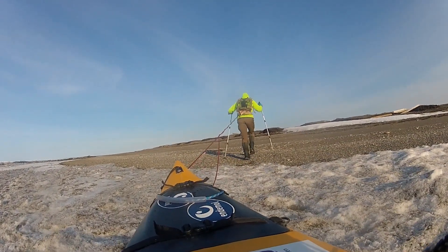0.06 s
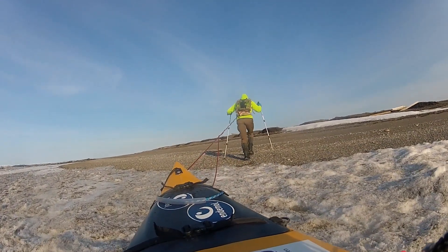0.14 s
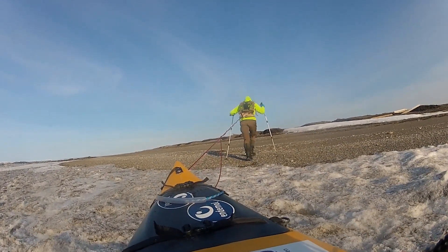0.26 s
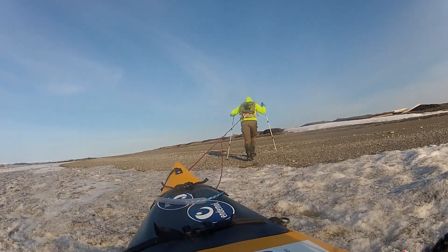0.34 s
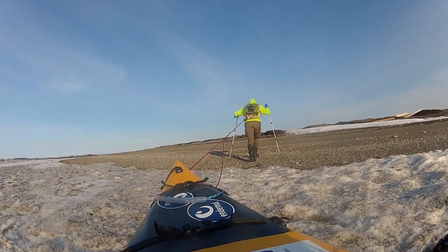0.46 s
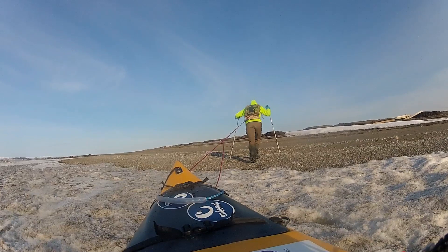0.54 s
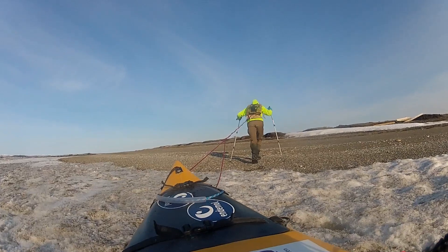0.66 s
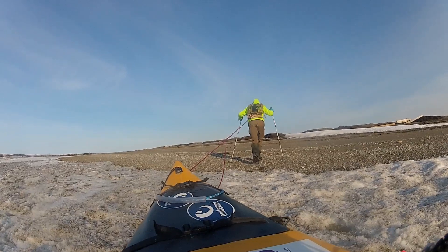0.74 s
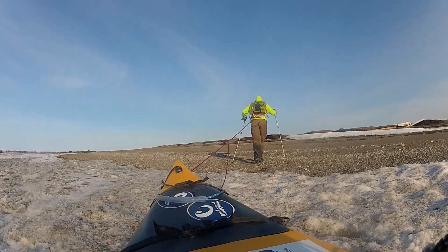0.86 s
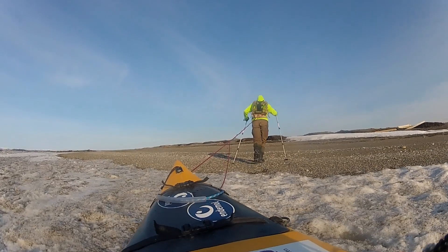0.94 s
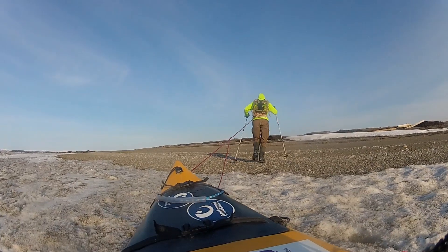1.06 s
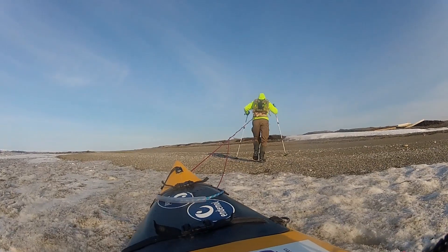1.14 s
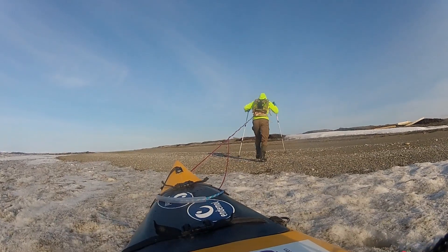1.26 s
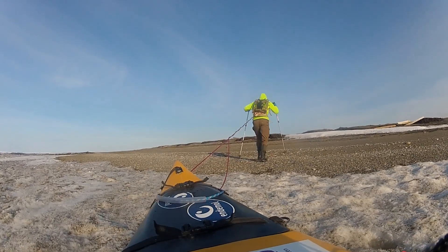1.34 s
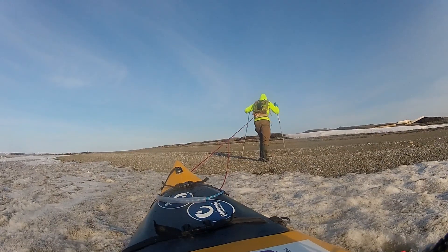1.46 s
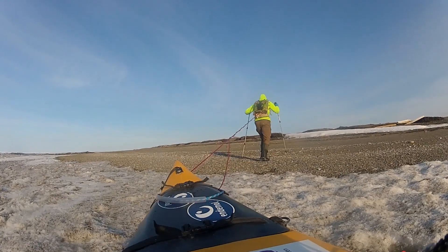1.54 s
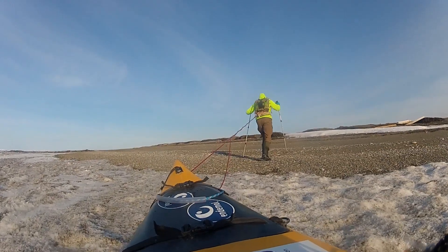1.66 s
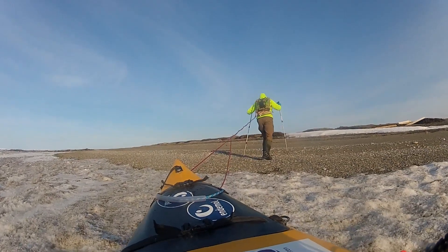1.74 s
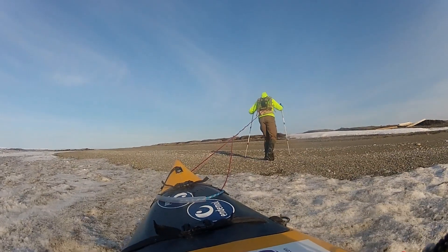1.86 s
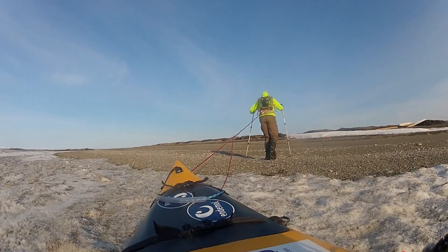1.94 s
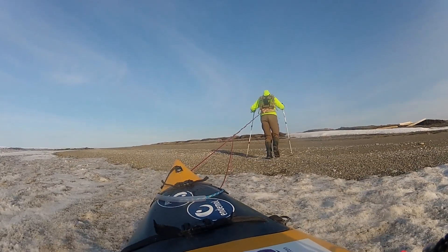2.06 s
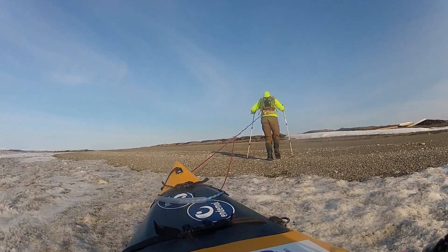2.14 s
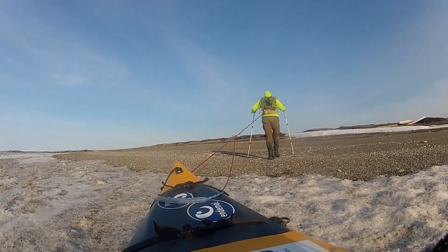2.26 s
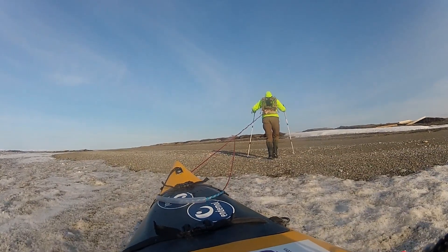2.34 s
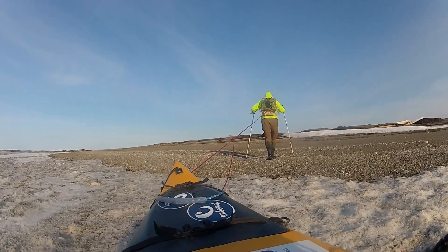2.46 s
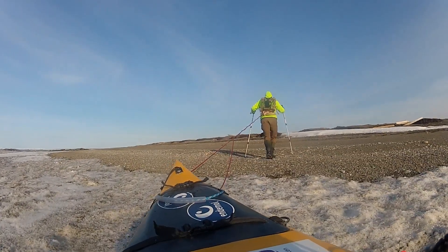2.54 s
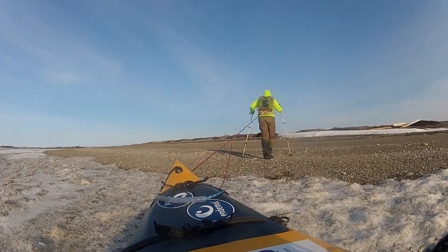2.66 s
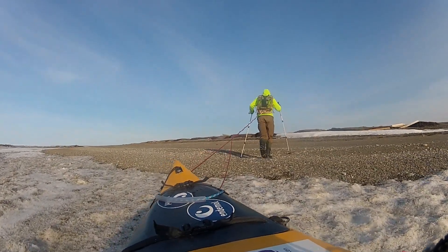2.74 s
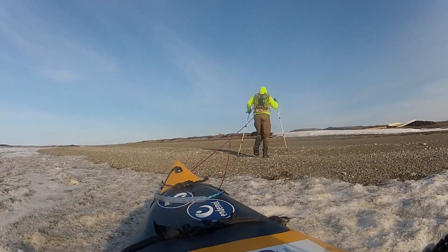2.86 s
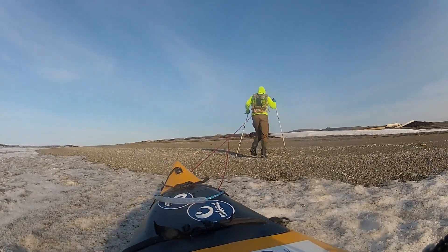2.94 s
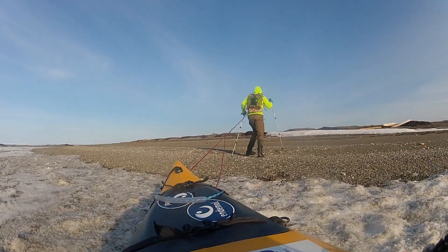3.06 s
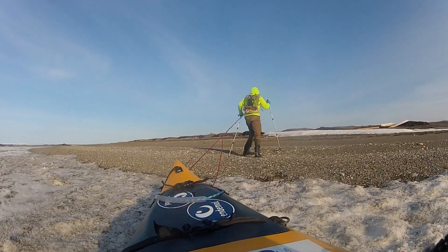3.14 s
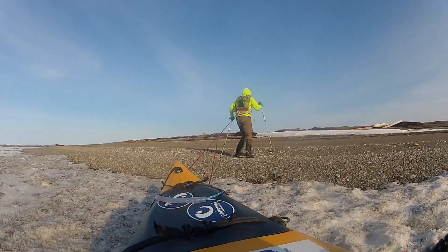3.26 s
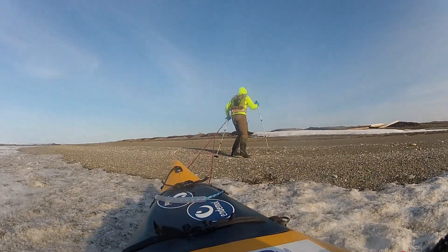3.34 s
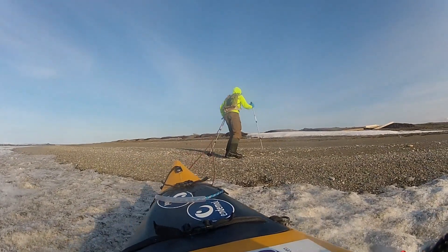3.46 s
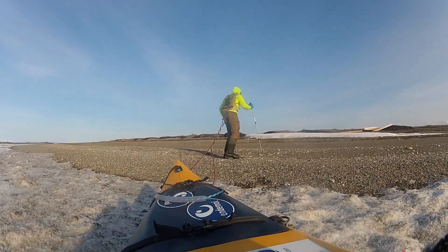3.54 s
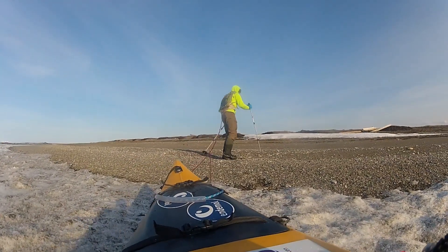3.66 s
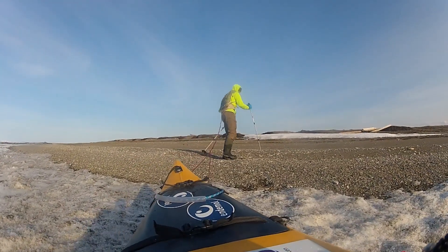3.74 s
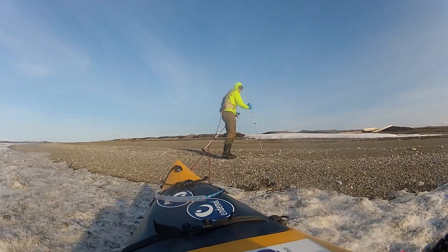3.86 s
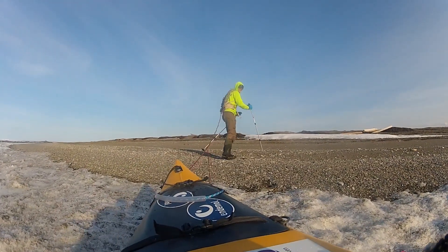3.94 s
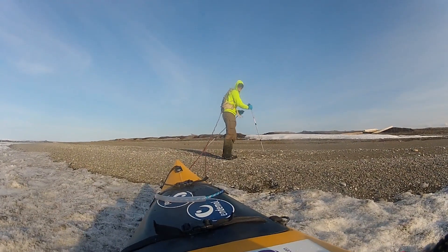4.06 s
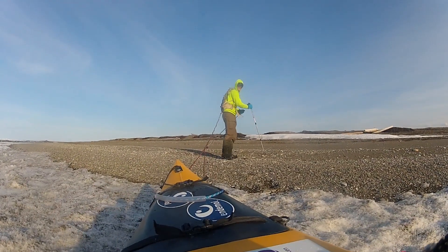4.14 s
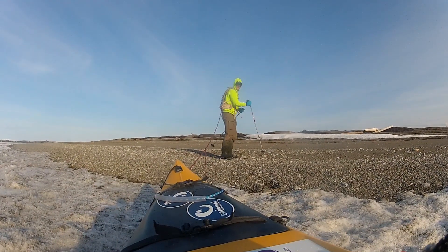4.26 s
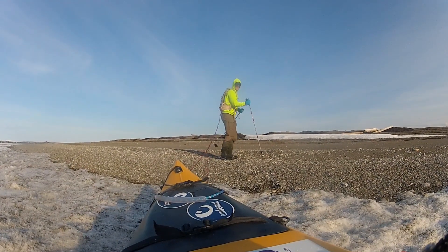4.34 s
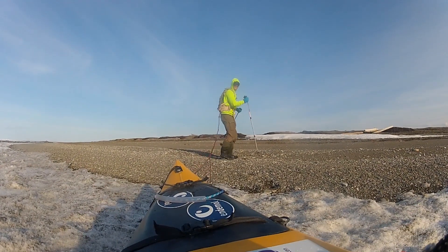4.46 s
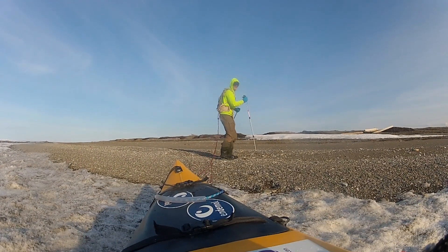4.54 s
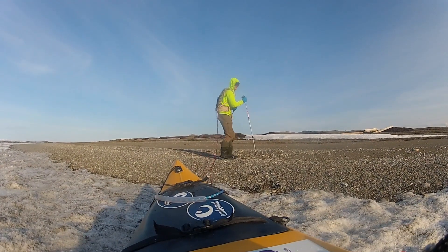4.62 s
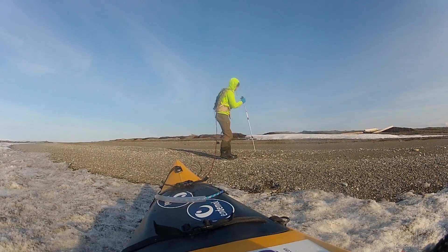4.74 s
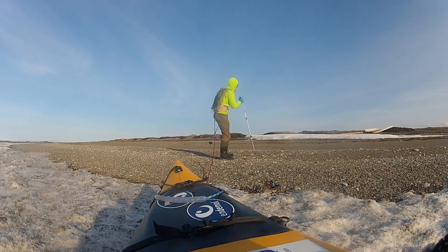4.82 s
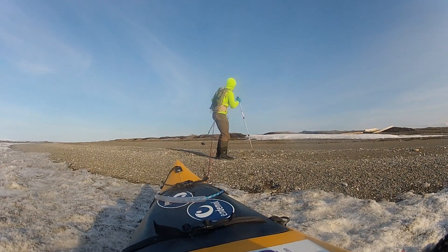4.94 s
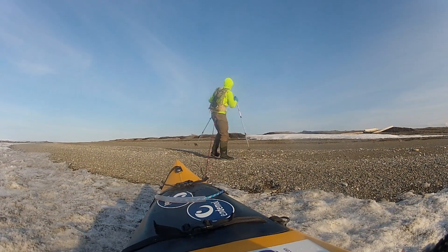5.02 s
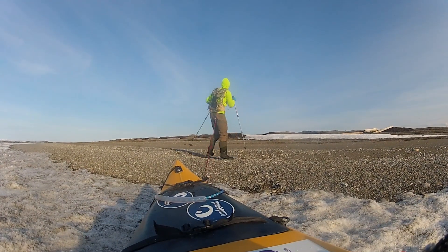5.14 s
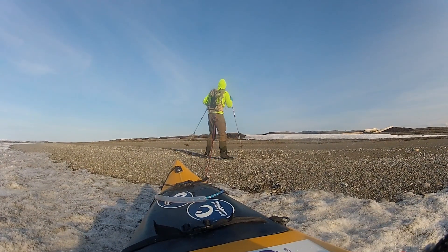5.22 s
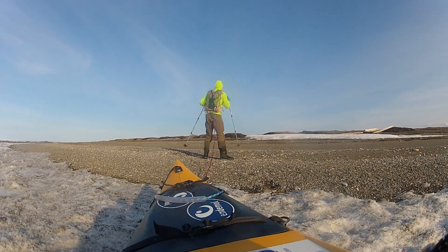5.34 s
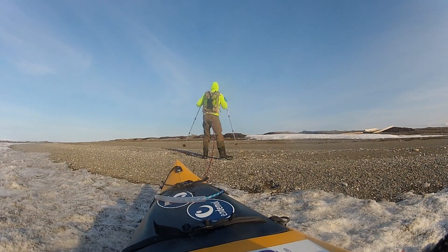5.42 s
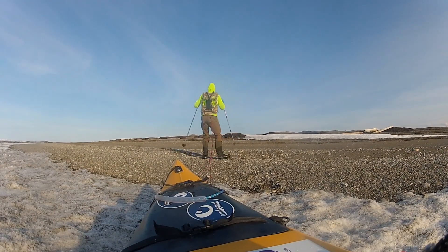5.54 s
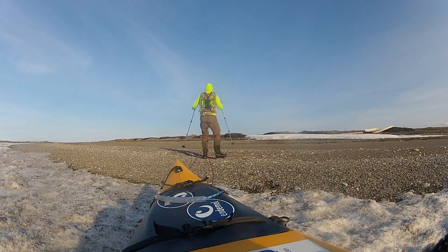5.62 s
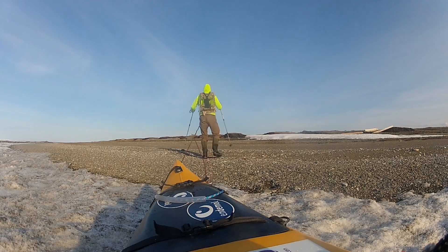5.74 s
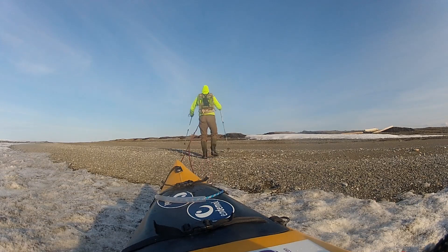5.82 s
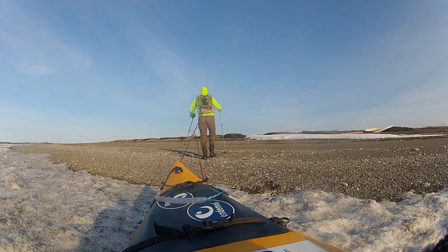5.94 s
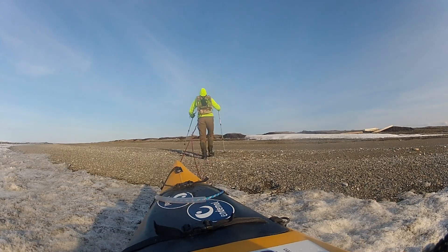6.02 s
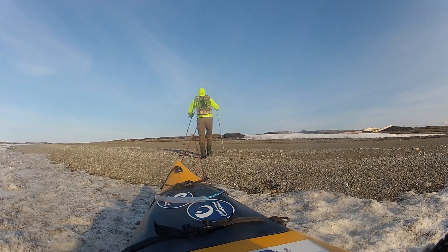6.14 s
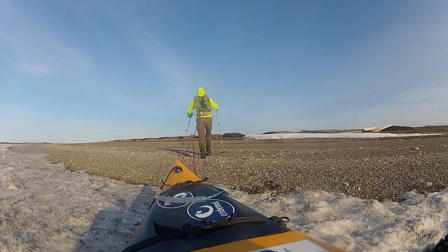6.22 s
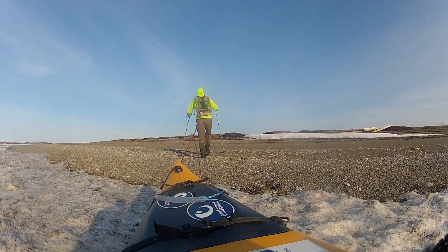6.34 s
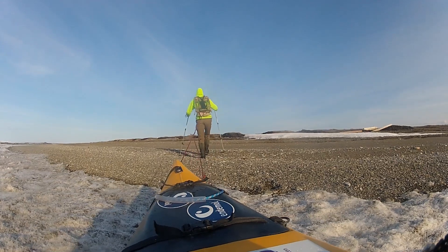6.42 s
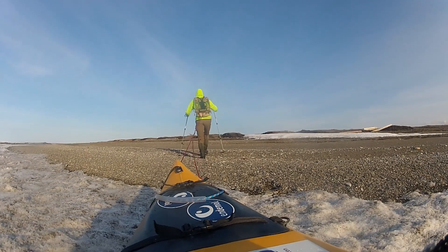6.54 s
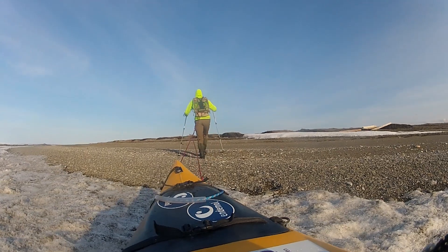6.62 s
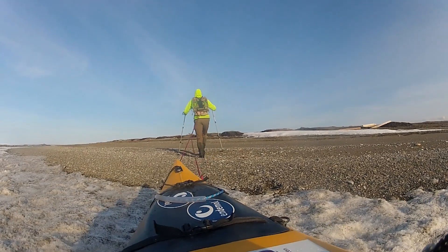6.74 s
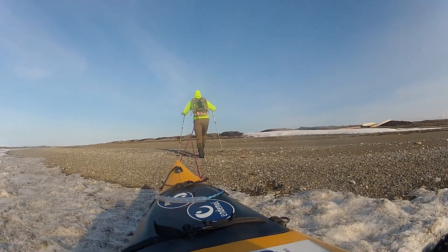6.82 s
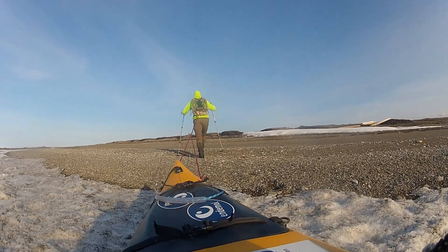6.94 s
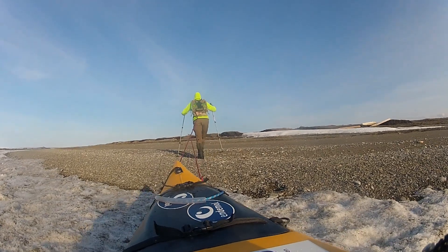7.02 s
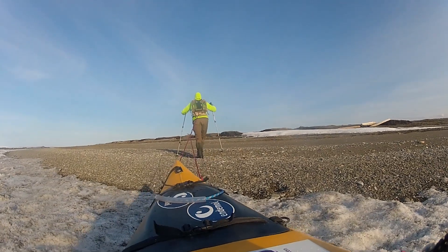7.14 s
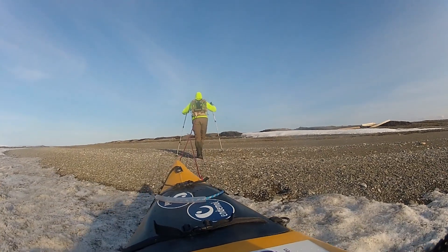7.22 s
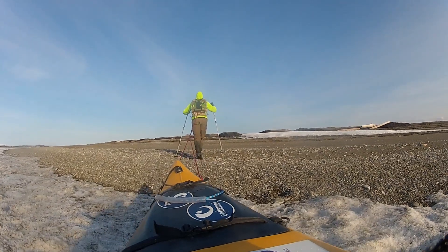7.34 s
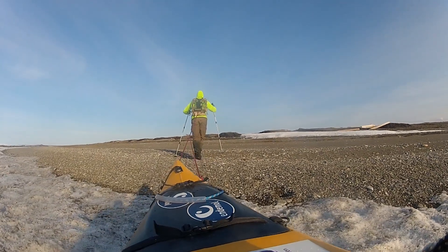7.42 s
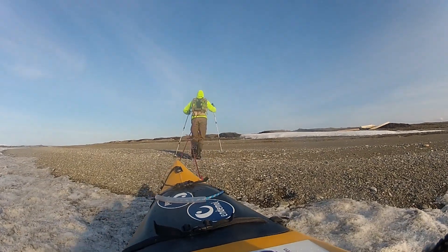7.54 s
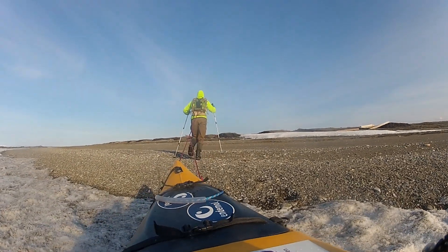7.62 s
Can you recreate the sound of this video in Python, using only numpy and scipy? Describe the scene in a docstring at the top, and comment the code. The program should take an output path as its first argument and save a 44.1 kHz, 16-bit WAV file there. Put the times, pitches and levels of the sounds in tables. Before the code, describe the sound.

A hollow plastic hull is dragged over crusty snow and stones, grinding, drumming and cracking, stops for a second, then scrapes onward in light wind.

```python
"""A plastic hull with a camera strapped on deck is towed over crusty snow and stones, stops, and is towed on.
From the start, streams of clicks ring the shell as drumming and the mount as grind, under thumps, cracks and knocks.
A smooth hiss of fine grains joins after 1.5 s and fades by 4 s; near 4.4 s the scrape sinks, and the hull rests.
From about 5.5 s bumps return, then the drumming and scrape swell again; light wind, a shaped noise, runs throughout.
The camera samples slowly and holds each value, so a mirror of the sound lies around the sampling rate."""
import sys
import numpy as np
from scipy import signal
from scipy.fft import rfft, irfft
from scipy.io import wavfile

SR = 44100
rng = np.random.default_rng(int(sys.argv[2]) if len(sys.argv) > 2 else 0)


def inscribe(sig):
    """Save sig as 16-bit PCM at rate SR to the path in sys.argv[1].

    A 1-D sig is mono; a 2-D sig holds one channel per row.
    Samples are clipped to [-1, 1] before scaling.
    """
    pcm = np.round(np.clip(np.atleast_2d(sig).T, -1, 1) * 32767)
    wavfile.write(sys.argv[1], SR, pcm.astype(np.int16))


N = 338688

# Source levels in these tables are settings ahead of each layer's fixed trim.
# How hard the ground drums the shell. Each row: time in seconds, level in dB.
HAUL = [(0, -43), (.3, -44.5), (.6, -46.5), (.92, -43.5), (1.3, -48), (1.7, -45.5), (1.95, -46.5),
        (2.08, -50), (2.6, -46), (2.9, -51), (3.25, -47), (3.44, -40.5), (3.74, -48.5), (3.9, -43.5),
        (4.02, -45), (4.08, -49), (4.22, -51.5), (4.3, -59), (5.4, -61.5), (5.75, -55.5), (5.97, -56),
        (6.3, -52), (6.46, -55), (6.72, -45.5), (7.12, -48), (7.3, -47.5), (7.5, -46), (7.68, -47.5)]
# Drumming resonances of the shell. Each row: centre in Hz, width in Hz, relative level in dB.
SHELL_MODES = [(133.5, 38.2, 5), (256.3, 89.6, -8)]
# Rattle resonances in the hollow of the hull. Each row: centre in Hz, width in Hz, relative level in dB.
HOLLOW_MODES = [(342, 62, -2.5), (595, 217, -4.5), (651, 170, -3.5)]
# Slow mode of the whole boat. Its row: centre in Hz, width per pass in Hz, relative level in dB.
PITCHING_MODE = [(26.9, 19.7, 0)]
# The camera shaking on its arm. Its row: centre in Hz, width per pass in Hz, relative level in dB.
SHUDDER_MODE = [(63.5, 30.5, 0)]
# The bow lurches over a ridge. Each row: peak in seconds, pitching in dB, length in seconds, shudder in dB.
LURCHES = [(.07, -50, .04, -56), (0.413, -51, 0.12, -64), (0.647, -47, .04, -49), (.79, -47, 0.071, -46),
           (0.935, -36.5, 0.056, -51.5), (1.313, -44.5, 0.24, -58), (1.663, -35, 0.062, -53),
           (1.936, -45, 0.046, -53), (2.144, -40, 0.076, -50), (2.505, -45.5, 0.13, -53),
           (2.725, -42, 0.086, -60), (3.004, -40.5, 0.064, -58), (3.11, -46, 0.056, -48.5),
           (3.297, -40.5, 0.039, -66), (3.433, -43, 0.042, -46), (3.88, -38, 0.048, -57),
           (4.004, -41, .04, -58), (4.224, -51, 0.037, -72), (4.385, -50.5, 0.049, -68),
           (6.165, -44, 0.078, -58), (6.307, -49, 0.044, -72), (6.547, -51, 0.066, -51),
           (6.968, -44, 0.14, -55), (7.115, -52, .04, -51.5), (7.3, -44.5, 0.12, -57.5),
           (7.62, -54, 0.033, -50.5)]
# Lumps under the keel. Each row: start in seconds, level in dB, pitch in Hz, time to fall 60 dB in seconds.
THUMPS = [(.077, -21.5, 133, 0.089), (0.101, -21.5, 102, 0.05), (.127, -30, 117, 0.067),
          (.159, -30.5, 134, 0.14), (.525, -35, 135, 0.14), (.574, -32, 139, 0.1), (.698, -30.5, 145, 0.16),
          (.768, -33, 138, .12), (.931, -36, 150, 0.24), (1.299, -28, 136, 0.084),
          (1.644, -15.5, 124, 0.06), (1.784, -35, 139.6, 0.16), (1.961, -29, 125, 0.098),
          (2.103, -31, 101, 0.14), (2.149, -25.5, 120, 0.062), (2.648, -35, 138, 0.073),
          (2.732, -38, 123, 0.065), (2.964, -28.5, 125, 0.071), (3.457, -16, 172, 0.031),
          (3.818, -24, 151, 0.064), (3.885, -39, 164, .11), (4.024, -29, 100, .063),
          (4.132, -39, 157, 0.22), (5.573, -41, 149, 0.086), (5.835, -39, 135, .14),
          (5.91, -37.5, 142, 0.12), (6.017, -29, 149, 0.055), (6.174, -37, 149, 0.094),
          (6.472, -34.5, 147, 0.096), (6.518, -31.5, 152, 0.092), (6.545, -33.5, 137, .1),
          (6.59, -31.5, 159, 0.081), (6.947, -32, 153, 0.12), (7.228, -39, 101, .093)]
# The steady scrape. Each row: time in seconds, grind in dB, crunch in dB.
SCRAPE = [(0, -52.5, -58), (.23, -56.5, -61.5), (.36, -53.5, -58.5), (.75, -52.5, -61), (.95, -50, -55.5),
          (1.25, -52, -61), (1.8, -52, -56), (2.15, -54.5, -69), (2.4, -58, -68), (2.7, -54.5, -62),
          (2.87, -59, -69), (3.12, -54.5, -60), (3.36, -49.5, -54), (3.62, -55, -59.5),
          (3.77, -64.5, -69.5), (3.85, -56, -64), (4.15, -63.5, -68), (4.4, -81, -81.5),
          (5.6, -80.5, -77.5), (6.0, -75, -74), (6.12, -65, -72), (6.5, -68.5, -73.5), (6.67, -59, -67),
          (7.0, -58, -63.5), (7.25, -57.5, -62), (7.68, -55.5, -63.5)]
# A harder patch rasps along the hull. Each row: peak in seconds, grind in dB, length in seconds,
# crunch in dB over the grind, rattle in dB over the grind.
RASPS = [(0.095, -51, 0.038, -7, -1), (0.164, -49, 0.025, -5.5, -13), (.32, -52, 0.052, -11, -14),
         (.82, -54.5, 0.049, -1.5, -4), (.9, -47, .03, -10, -16), (1.21, -50, .02, -14, -19),
         (1.506, -62, .04, 4, -14), (1.678, -45, 0.047, -11, -7), (1.74, -50, .03, -15, -1),
         (2.1, -53, .02, -14, 1.5), (2.27, -58.5, 0.048, -3, -4), (2.458, -57.5, .05, 0, -8),
         (2.655, -50, .012, -11, -9), (2.742, -56.5, 0.051, -4, -1), (2.98, -57.5, 0.038, -8, 3),
         (3.1, -59, 0.059, -9, 6), (3.24, -59.5, 0.046, -8, 7), (3.428, -40.5, 0.059, -5, -6),
         (3.508, -45, 0.072, -10, -4), (3.695, -57.5, 0.035, -5, -6), (3.84, -56.5, 0.025, -9, 1.5),
         (3.91, -62, .03, -10, 5), (4.01, -61, 0.039, -5, 3), (5.582, -61, .01, -14, -8),
         (5.839, -60, 0.0074, -11, -8), (5.903, -77.5, 0.028, 15, 1.5), (6.008, -59, 0.013, -16, 1),
         (6.078, -59, .012, -14, -9), (6.158, -60, 0.037, -11, 1), (6.605, -52.5, 0.021, -10, -19),
         (6.635, -62, .015, 0, -12), (6.91, -52, .025, -6, -17), (7.323, -55, 0.042, -20, -13),
         (7.55, -62.5, 0.077, -2, 5.5)]
# Grind resonances of the camera mount. Each row: centre in Hz, width in Hz, relative level in dB.
MOUNT_MODES = [(1159, 126, 3.5), (1510, 280, -4), (1967, 362, 3.5), (2328, 308, 3), (2920, 330, -10),
               (3445, 310, -5.5)]
# Bright crunch resonances. Each row: centre in Hz, width in Hz, relative level in dB.
CRUNCH_MODES = [(3645, 470, -4), (4190, 900, -1), (4820, 580, -1.5), (5660, 310, -10.5), (3396, 1050, -4.5)]
# A stretch of smooth packed snow, hissing. Each row: time in seconds, level in dB.
GLIDE = [(0, -69), (.8, -70), (1.2, -64), (1.5, -54), (1.65, -49.5), (1.9, -49), (2.15, -50.5), (2.25, -57),
         (2.6, -53), (2.8, -53.5), (3.0, -56.5), (3.3, -58), (3.45, -58), (3.7, -69), (4.1, -100),
         (7.68, -91)]
# Hiss resonances of packed snow. Each row: centre in Hz, width in Hz, relative level in dB.
PACKED_MODES = [(2314, 166, 2), (2800, 310, -18), (3257, 127, 0), (3670, 1350, -8.5), (4900, 450, -11)]
# Crust cracking. Each row: start in seconds, level in dB, brightness in dB.
CRACKS = [(.07, -38.5, 5), (.102, -30, 3), (.167, -32, 6.5), (0.2718, -26.5, 3), (.3184, -26.5, -0.5),
          (.392, -30.5, 8), (.43, -35, 4.5), (0.808, -39, 7), (.853, -34, 0), (0.901, -31, 10),
          (1.6207, -27, -1), (1.641, -23, 2.5), (1.707, -30, -2), (1.736, -34, 3), (2.1037, -30, 2),
          (2.171, -29.5, -0.5), (2.622, -31, 1), (2.646, -32.5, 8.5), (2.744, -28.5, 2), (2.961, -32, 1.5),
          (3.07, -36, -3), (3.422, -30, -4), (3.4425, -27, -1), (3.592, -36, 3), (3.685, -36, 4),
          (3.818, -34.5, 0.5), (3.834, -43, -6), (3.8671, -31, 1), (3.895, -36, -5.5), (3.928, -36, -4.5),
          (3.94, -35, 1), (3.9785, -37, 3), (4.003, -40, 2), (4.024, -45, 10), (4.06, -40, -0.5),
          (4.09, -44, 0), (4.133, -38.5, 0.5), (4.163, -45.5, -2), (4.196, -42, -2), (5.559, -47, 11),
          (5.833, -48, 5), (5.8788, -49.5, 19), (5.907, -39, 5), (6.012, -52, -3), (6.124, -47, 5),
          (6.1474, -45, 1), (6.239, -41.5, -0.5), (6.464, -44, 0), (6.519, -41.5, 0), (6.557, -38.5, -0.5),
          (6.592, -30.5, 3), (6.6144, -41, 7), (6.636, -46, 10), (6.899, -30.5, 0.5), (7.318, -36, 3.5),
          (7.346, -43, -1), (7.617, -38.5, -2)]
# Fittings knocking on deck. Each row: start in seconds, level in dB, hardness in dB per octave.
KNOCKS = [(.077, -42.5, -6), (.086, -35.5, -2.5), (1.695, -34.5, 6), (1.707, -40, 5), (2.097, -42, 1),
          (3.815, -48, 0), (3.891, -44, 7), (4.379, -45, 1.5), (5.574, -49.5, 7), (6.0, -35.5, 4),
          (6.523, -52, -6.5)]
# Modes of the deck. Each row: pitch in Hz, relative level in dB, time to fall 60 dB in seconds.
DECK_MODES = [(202.5, 14.5, 0.024), (284, -3, 0.019), (406, -29, 0.023), (598, 5, 0.019),
              (880, 2.5, 0.0083), (1144, 4.5, 0.0082), (1640, -10, 0.011), (2310, -9.5, 0.0077)]
# Spectrum of the wind. Each row: frequency in Hz, relative density in dB per Hz.
WIND_SPECTRUM = [(12, -46), (20, -15), (32, -4), (48, -1.5), (144, -5), (166, -22), (313, -16),
                 (435, -25.5), (1310, -30.5), (3280, -33), (5500, -36.5), (7150, -81), (12100, -120)]

# Layers that follow the drumming: dB at the reference, share of its swing, wander in dB, wander corner in Hz.
PITCH_LAW, SHUDDER_LAW, RATTLE_LAW = (-53, 2, 3, 5), (-60, .7, 2, 4), (-61.5, 0.85, 2, 6)
DRUM_REFERENCE_DB = -47
DRUM_WANDER_DB, DRUM_WANDER_HZ = 2, 5.3
SWELL_RISE_SHARE = 0.7   # a swell rises in this share of the time it takes to fall
THUMP_RISE_S, KNOCK_RISE_S = 0.0056, 0.0013
CRACK_RISE_S, CRACK_DECAY_S = 0.0017, 0.0027   # time constants; the decay is for brightness 0
BRIGHT_SHORTENS = 0.29   # dB the decay time shrinks per dB of brightness
WIND_DB = -58
SAMPLING_HZ, GUARD_HZ, CUTOFF_HZ = 12000, 6020, 15270


def drumming(drum_db, rattle_db):
    """Soft bumps of the ground, hundreds a second, ring the shell; smaller ones join them to rattle its hollow."""
    bumps = grains(500, 2.3, 0.53)
    small_bumps = 0.19 * bumps + grains(1800, 2.0, 0.43)
    shell = from_db(drum_db) * rms_one(resonate(bumps, SHELL_MODES))
    rattle = from_db(rattle_db - 0.5) * rms_one(resonate(small_bumps, HOLLOW_MODES))
    return shell + rattle


def rocking(pitch_db, shudder_db):
    """The same jolts pitch the boat and shake the camera; each mode is passed twice for a narrow band."""
    jolts = grains(900, 1.0, 0.3)
    pitching = rms_one(resonate(resonate(jolts, PITCHING_MODE), PITCHING_MODE))
    shudder = rms_one(resonate(resonate(jolts, SHUDDER_MODE), SHUDDER_MODE))
    return from_db(pitch_db + 1.0) * pitching + from_db(shudder_db + 7.0) * shudder


def thumps():
    """Each lump gives a few cycles of the shell's lowest mode with a weaker, shorter upper one."""
    out = np.zeros(N)
    for s, level_db, hz, t60 in THUMPS:
        low = decaying(hz, t60, THUMP_RISE_S)
        upper = 0.21 * decaying(1.85 * hz, 0.71 * t60, THUMP_RISE_S)
        add(out, s, -from_db(level_db + 4.5) * (low + upper))
    return out


def grind(grind_db, crunch_db):
    """Ice grains scour the hull and ring the mount; with finer grains added they ring as bright crunch."""
    scour = grains(6000, 1.34, 1.18)
    finer = 0.78 * scour + grains(9800, 4.1, 0.87)
    through_mount = from_db(grind_db - 1.5) * rms_one(resonate(scour, MOUNT_MODES))
    crunch = from_db(crunch_db + 1) * rms_one(resonate(finer, CRUNCH_MODES))
    return through_mount + crunch


def glide(level_db):
    """Very fine, even grains ring the packed snow's resonances: a steady hiss."""
    return from_db(level_db) * rms_one(resonate(grains(15000, 2.6, 0.33), PACKED_MODES))


def cracks():
    """Breaking crust gives short noise bursts on both paths of the grind; bright ones favour the crunch."""
    dull, bright = np.zeros(N), np.zeros(N)
    t = np.arange(round(.04 * SR)) / SR
    onset = 1 - np.exp(-t / CRACK_RISE_S)   # a crack takes a moment to run
    for s, level_db, bright_db in CRACKS:
        decay = np.exp(-t / CRACK_DECAY_S * from_db(BRIGHT_SHORTENS * bright_db))
        burst = rng.standard_normal(len(t)) * onset * decay
        add(dull, s, from_db(level_db - bright_db) * burst)
        add(bright, s, from_db(level_db + bright_db) * burst)
    return from_db(7.0) * resonate(dull, MOUNT_MODES) + from_db(3.5) * resonate(bright, CRUNCH_MODES)


def knocks():
    """Every knock strikes all deck modes; a harder contact tilts the level towards the higher ones."""
    out = np.zeros(N)
    for s, knock_db, hardness_db in KNOCKS:
        for hz, mode_db, t60 in DECK_MODES:
            tilt_db = hardness_db * np.log2(hz / 650)
            add(out, s, -from_db(knock_db + mode_db + tilt_db) * decaying(hz, t60, KNOCK_RISE_S))
    return out


def wind():
    """Air blowing on the microphone port: noise with a falling spectrum, wavering a little."""
    hz = np.arange(N // 2 + 1) * SR / N + 1   # the 1 keeps the logarithm finite
    knots_hz, knots_db = np.transpose(WIND_SPECTRUM)
    shape = from_db(np.interp(np.log(hz), np.log(knots_hz), knots_db))
    noise = irfft(rfft(rng.standard_normal(N)) * shape, N)
    waver_db = .6 * drift(8)
    return from_db(WIND_DB + waver_db) * rms_one(noise)


def grains(per_s, spread_db, clump_db):
    """Random clicks of uneven size and either sign whose strength comes in clumps; rms 1."""
    sizes = from_db(spread_db * np.minimum(rng.exponential(1, N), 4)) * rng.choice([-1, 1], N)
    born = rng.random(N) < per_s / SR
    clumps = from_db(clump_db * (drift(8.1) + drift(64)))
    return rms_one(sizes * born * clumps)


def resonate(x, peaks):
    """Parallel two-pole resonances, summed with alternating sign."""
    out = 0
    for k, (hz, width_hz, level_db) in enumerate(peaks):
        r = np.exp(-np.pi * width_hz / SR)
        b = np.array([1, 0, -1]) * (1 - r * r) / 2
        a = [1, -2 * r * np.cos(2 * np.pi * hz / SR), r * r]
        out = out + (-1) ** k * from_db(level_db) * signal.lfilter(b, a, x)
    return out


def decaying(hz, t60, rise_s):
    """A sine that swells quickly and dies away, cut at 0.2 s."""
    t = np.arange(round(.2 * SR)) / SR
    return np.sin(2 * np.pi * hz * t) * (1 - np.exp(-t / rise_s)) * from_db(-60 * t / t60)


def add(out, s, sound):
    """Mixes a short sound in at a time in seconds."""
    i = round(s * SR)
    out[i:i + len(sound)] += sound[:N - i]


def swells(base_db, events, level_db):
    """A level in dB with a short bell-shaped swell laid on it at each event, summed as power."""
    t, power = np.arange(N) / SR, from_db(2 * base_db)   # twice the dB as gain is power
    for (s, _, length_s, *_), top_db in zip(events, level_db):
        near = slice(max(round((s - 6 * length_s) * SR), 0), round((s + 6 * length_s) * SR))
        span = np.where(t[near] < s, SWELL_RISE_SHARE * length_s, length_s)
        power[near] += from_db(2 * top_db) * np.exp(-2 * ((t[near] - s) / span) ** 2)
    return 10 * np.log10(power)


def following(drum_db, law):
    """A level that takes a share of the drumming's swing and wanders by chance."""
    level_db, share, wander_db, wander_hz = law
    return level_db + share * (drum_db - DRUM_REFERENCE_DB) + wander_db * drift(wander_hz)


def drift(corner_hz):
    """Slow chance of spread 1: noise at a 40th of the rate through a double one-pole low-pass."""
    r = np.exp(-80 * np.pi * corner_hz / SR)
    slow = signal.lfilter([1], [1, -2 * r, r * r], rng.standard_normal(N // 40 + 2002))
    slow = slow[2000:]   # drops the filter's settling
    return np.interp(np.arange(N) / 40, np.arange(len(slow)), rms_one(slow))


def in_time(rows):
    """The columns of a curve table, one value per sample."""
    s, *columns = np.transpose(rows)
    return [np.interp(np.arange(N) / SR, s, c) for c in columns]


def from_db(db):
    """Decibels to gain."""
    return 10 ** (np.asarray(db) / 20)


def rms_one(x):
    """Scaled to unit rms."""
    return x / np.sqrt(np.mean(x ** 2) + 1e-20)


def scene():
    """All sources summed in one channel; lurches lift the rocking, rasps lift grind, crunch and rattle."""
    drum_db, = in_time(HAUL)
    grind_db, crunch_db = in_time(SCRAPE)
    _, lurch_db, _, shake_db = np.transpose(LURCHES)
    _, rasp_db, _, crunch_over_db, rattle_over_db = np.transpose(RASPS)

    rattle_db = swells(following(drum_db, RATTLE_LAW), RASPS, rasp_db + rattle_over_db)
    body = drumming(drum_db + DRUM_WANDER_DB * drift(DRUM_WANDER_HZ), rattle_db)
    pitch_db = swells(following(drum_db, PITCH_LAW), LURCHES, lurch_db)
    shudder_db = swells(following(drum_db, SHUDDER_LAW), LURCHES, shake_db)
    body = body + rocking(pitch_db, shudder_db)

    grind_db = swells(grind_db, RASPS, rasp_db)
    crunch_db = swells(crunch_db, RASPS, rasp_db + crunch_over_db)
    scrape = grind(grind_db, crunch_db) + glide(*in_time(GLIDE))
    return (body + thumps() + scrape + cracks() + knocks() + wind())[None]


def record(dry):
    """The camera's guard low-pass, slow sampling with each sample held until the next, and top cut."""
    guarded = signal.sosfilt(signal.cheby1(8, .5, GUARD_HZ, fs=SR, output="sos"), dry)
    carrier = np.cos(2 * np.pi * SAMPLING_HZ * np.arange(N) / SR)
    sampled = guarded * (1 + 2 * carrier)   # the sound and its first mirror pair
    hold = np.sinc(np.arange(N // 2 + 1) * SR / N / SAMPLING_HZ)   # a staircase has this response
    stairs = irfft(rfft(sampled) * hold, N)
    return signal.sosfilt(signal.ellip(9, .5, 45, CUTOFF_HZ, fs=SR, output="sos"), stairs)


dry = scene()
out = record(dry)
inscribe(out)
```